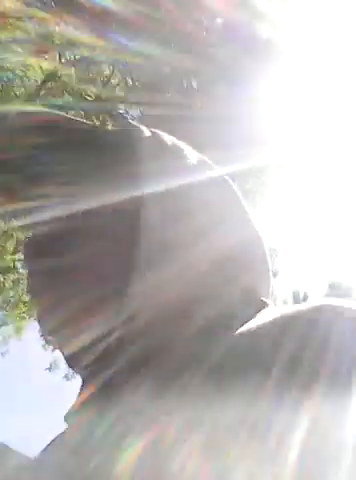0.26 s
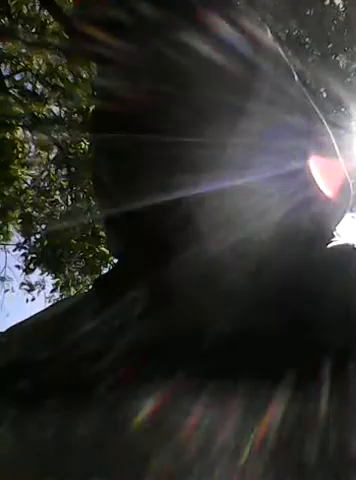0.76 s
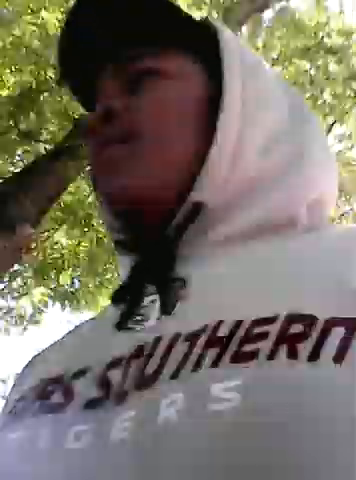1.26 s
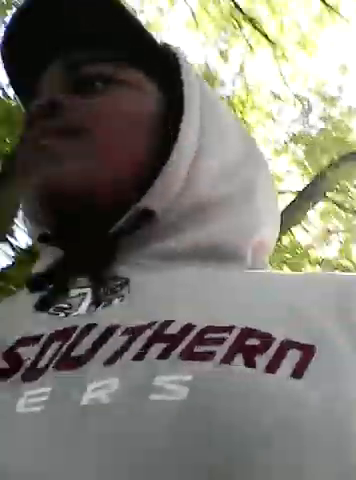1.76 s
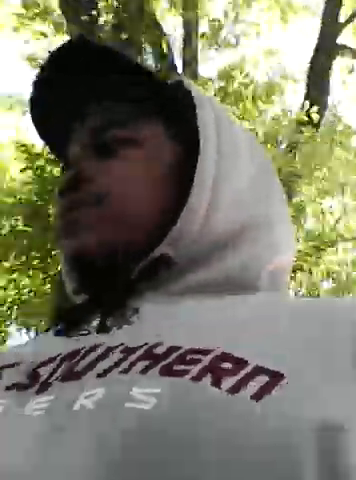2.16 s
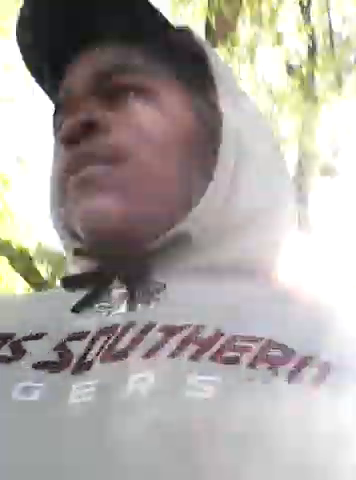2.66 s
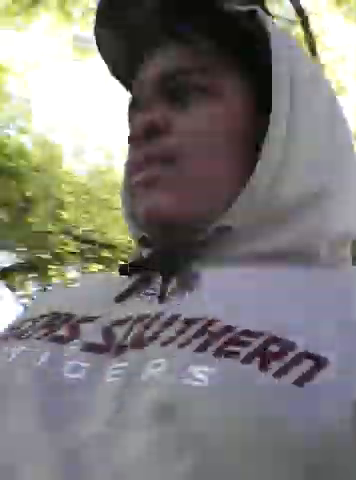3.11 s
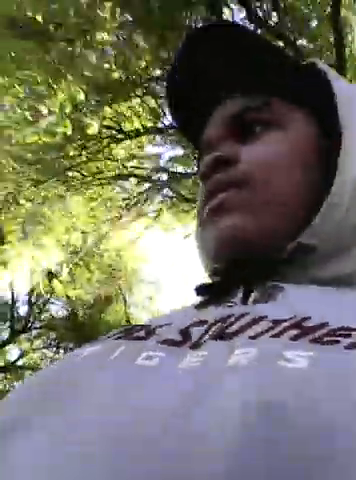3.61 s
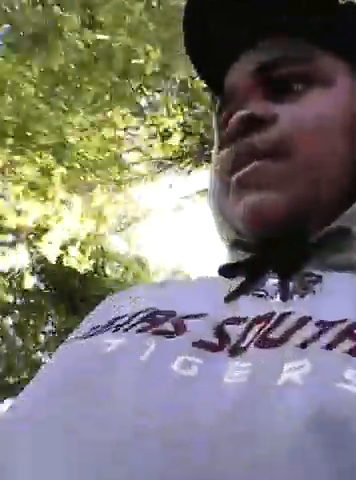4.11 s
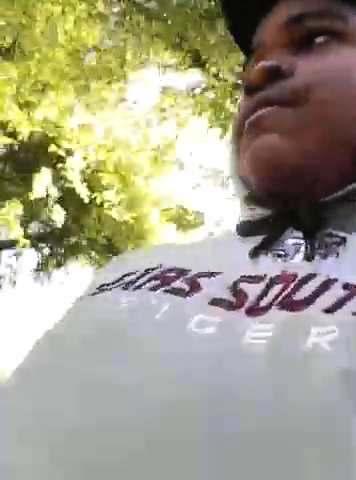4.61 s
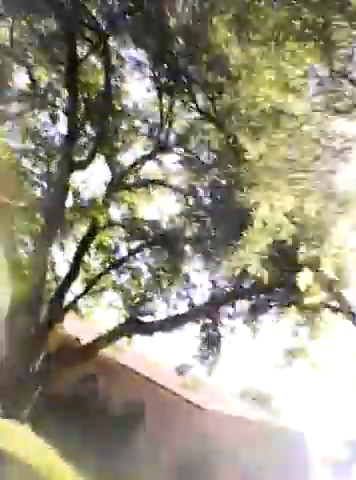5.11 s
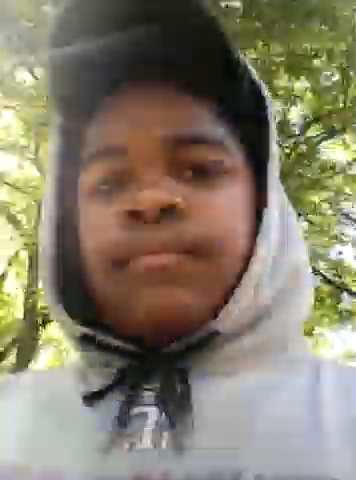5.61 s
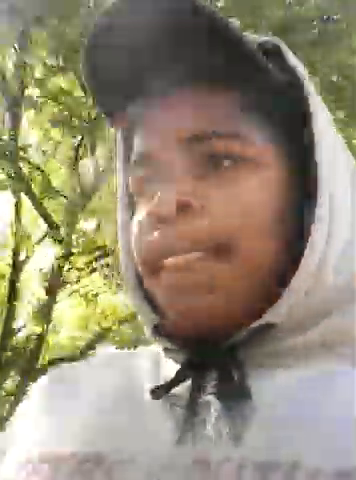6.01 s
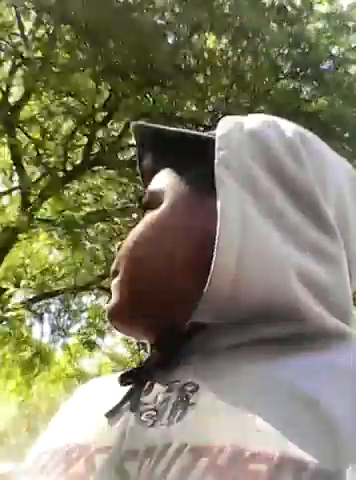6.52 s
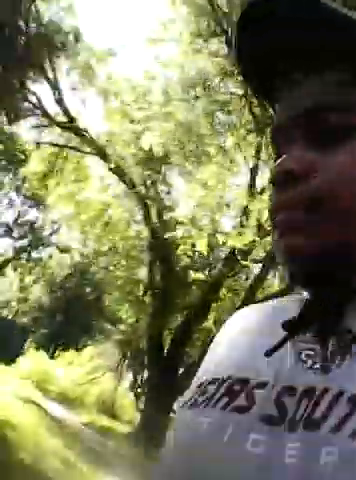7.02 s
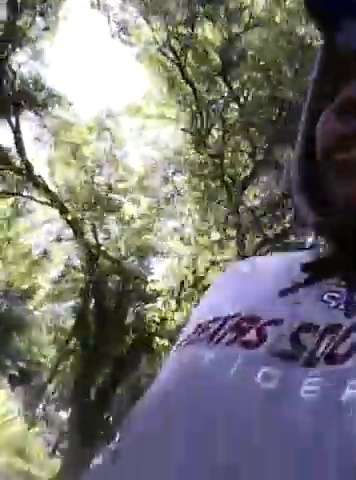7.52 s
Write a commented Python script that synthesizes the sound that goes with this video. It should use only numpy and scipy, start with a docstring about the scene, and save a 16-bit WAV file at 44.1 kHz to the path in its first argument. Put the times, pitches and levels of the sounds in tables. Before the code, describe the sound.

Skateboard rumbling over rough pavement outdoors, hard wheels whirring, with thumps and clacks, a dense clattering burst midway, then a gritty hiss swelling and fading.

```python
"""A rumbling skateboard deck and whirring hard wheels come first, dotted with thumps, clacks and a dry snap.
The grain of the pavement drives deck and wheels as noise through resonances and colour filters.
Thumps, edges, grit and a pebble give short coloured bursts; a shoe scuffs in gated, gritty noise.
Faint gliding bands of noise come and go, air buffets the microphone and a broad rush swells and fades.
The rider holds a phone, which hears all this through two microphones."""
import sys
import numpy as np
from scipy import signal
from scipy.fft import rfft, irfft, next_fast_len
from scipy.io import wavfile
from scipy.ndimage import uniform_filter1d

SR = 44100
rng = np.random.default_rng(int(sys.argv[2]) if len(sys.argv) > 2 else 0)


def transcribe(signal):
    """Save signal, clipped to [-1, 1], as a 16-bit WAV file at the path in sys.argv[1]."""
    frames = np.atleast_2d(signal).T
    limited = np.clip(frames, -1, 1)
    pcm = np.round(limited * 32767).astype(np.int16)
    wavfile.write(sys.argv[1], SR, pcm)


N = 342304

# the paving along the ride, before the bumps: time_s, deck_rumble_db, wheel_whirr_db
RIDE_LEVELS = [(0, -15.5, -38.5), (0.3, -16, -38), (0.75, -16.5, -41), (1.0, -18.5, -38),
               (1.35, -16.5, -38), (1.86, -16.5, -38), (1.9, -22, -41.5), (2.3, -22, -39),
               (2.85, -18.5, -41.5), (3.25, -22.5, -40), (3.62, -24.5, -39.5), (4.15, -17.5, -41.5),
               (4.9, -25.5, -41), (5.35, -20.5, -39), (6.2, -25, -47), (6.35, -20.5, -49.5),
               (7.25, -22.5, -43), (7.76, -21, -41.5)]


def undb(db):
    """Decibels to gain."""
    return 10 ** (np.asarray(db) / 20)


def unit(x):
    """Scale to rms 1."""
    return x / np.sqrt(np.mean(x ** 2) + 1e-18)


def curve(rows, axis=1):
    """One column of a table, joined by straight lines in time."""
    rows = np.array(rows)
    return np.interp(np.arange(N) / SR, rows[:, 0], rows[:, axis])


def colour(x, points):
    """Causal, minimum-phase filter through the given (Hz, dB) points, built by folding the cepstrum."""
    n = next_fast_len(x.shape[-1], True)
    point_hz, point_db = np.transpose(points)
    hz = np.arange(n // 2 + 1) * SR / n + 1  # 1 Hz up, to keep the logarithm finite
    log_gain = np.log(undb(np.interp(np.log(hz), np.log(point_hz), point_db)))
    cepstrum = irfft(log_gain, n)
    cepstrum[1:n // 2] *= 2
    cepstrum[n // 2 + 1:] = 0
    response = np.exp(rfft(cepstrum))
    return irfft(rfft(x, n) * response, n)[..., :x.shape[-1]]


def resonate(x, hz, width_hz):
    """One resonance, gain 1 at its centre."""
    return signal.lfilter(*signal.iirpeak(hz, hz / width_hz, SR), x)


def power(hz, centre_hz, half_width_hz, db):
    """Power response of one resonance, 6 dB down at the half width."""
    return undb(2 * db) / (1 + ((hz - centre_hz) / half_width_hz) ** 2) ** 2


def walk(rate):
    """Smooth random drift of spread near 1, heading for fresh values at the given rate per second."""
    hold = int(SR / rate)
    steps = np.repeat(rng.standard_normal(N // hold + 1), hold)
    return unit(uniform_filter1d(steps, hold)[:N])


def grit(rate, spread_db):
    """Two unrelated streams of tiny impacts of uneven size; no grain is much larger than the rest."""
    push = (rng.random((2, N)) < rate / SR) * np.sign(rng.standard_normal((2, N)))
    size_db = spread_db * np.clip(rng.standard_normal((2, N)), -2, 2)
    return unit(push * undb(size_db))


def swell(full_s, hold_s, rise_db_per_s, fall_db_per_s):
    """A gain that rises to 1 at time full_s, holds and falls away."""
    t = np.arange(N) / SR
    rise_db = (t - full_s) * rise_db_per_s
    fall_db = (full_s + hold_s - t) * fall_db_per_s
    return undb(np.clip(np.minimum(rise_db, fall_db), -200, 0))


def heave(hz, cycles, size=4096):
    """A heavily damped swing that is strongest after the given number of cycles."""
    turn = np.arange(size) / SR * hz
    return np.sin(2 * np.pi * turn) * (turn / cycles) ** 2 * np.exp(2 - 2 * turn / cycles)


def burst(points, t60, hold_s=0, size=4096, strike=0.39, rebound=0.73, rebound_s=.006, chatter_db=4):
    """A contact: a clean strike and its rebound in uneven chatter that holds and dies away; a coloured pair."""
    strike_s = .0006  # just after the first touch
    t = np.arange(size) / SR
    decay = np.log(1000) / max(t60, .004)
    length_s = hold_s + 1 / (2 * decay)
    bounces = np.repeat(rng.uniform(-1, 1, size), 64)[:size]  # a new strength every 64 samples
    envelope = np.exp(-decay * np.maximum(t - hold_s, 0))
    force = rng.standard_normal((2, size)) * envelope * undb(chatter_db * bounces)
    strikes = np.array([strike_s, strike_s + rebound_s * rng.uniform(.5, 1)])
    force[0, (strikes * SR).astype(int)] += strike * np.sqrt(length_s * SR) * np.array([1, -rebound])
    # longer contacts carry more energy
    return unit(colour(force, points)) * np.sqrt(length_s * SR / size)


def sing(hz, width_hz):
    """A noise-driven resonance whose centre follows hz; a pair of rms 1."""
    drive = rng.standard_normal((2, N)) + 1j * rng.standard_normal((2, N))
    ring = signal.lfilter(*signal.butter(2, width_hz / 2, fs=SR), drive)
    return unit(np.real(ring * np.exp(2j * np.pi * np.cumsum(hz) / SR)))


def add(track, s, sound):
    """Mix a sound in at a given time."""
    start = max(int(s * SR), 0)
    track[:, start:start + sound.shape[-1]] += sound[..., :N - start]


def ports(pair, lean, wide_db, bass_hz=700):
    """Left and right from a sound and its diffuse twin; lean turns it towards the left microphone."""
    # difference of the two microphones against their sum, before wide_db: pitch_hz, level_db
    side_levels = [(100, -24), (450, -15.5), (1100, -5), (1700, -3.5), (2450, 1), (3300, -8.5),
                   (4000, -3.5), (4800, 4), (6800, 6), (8500, 3)]
    # how far each pitch follows the lean: pitch_hz, share
    lean_shares = [(200, .2), (1000, 0.85), (2500, 0.92), (4800, 0.94), (8000, 0.43)]
    bass_lead_s = .000045  # the bass reaches the left microphone this much earlier
    n = next_fast_len(N, True)
    hz = np.arange(n // 2 + 1) * SR / n + 1
    level_hz, level_db = np.transpose(side_levels)
    share_hz, share = np.transpose(lean_shares)
    side_db = wide_db + np.interp(np.log(hz), np.log(level_hz), level_db)
    lean = np.clip(lean * np.interp(np.log(hz), np.log(share_hz), share), -.97, .97)
    direct, diffuse = rfft(pair, n)
    lead = 1j * np.pi * hz * bass_lead_s / (1 + (hz / bass_hz) ** 2)
    mix = lean * direct + np.sqrt(1 - lean ** 2) * diffuse
    side = irfft(mix * undb(side_db) + lead * direct, n)[:N]
    return np.array([pair[0] + side, pair[0] - side])


def rumble(bumps):
    """The uneven ground rings the deck, most on the first stretch, and makes the whole board shudder."""
    # resonances of the deck with the rider on it, each passed twice: pitch_hz, width_hz (one pass), level_db
    deck_modes = [(137.5, 46.7, -1.5), (168.5, 46.6, 1.5), (200.8, 58.7, 0.5), (507, 130, -31),
                  (985, 62, -29)]
    # colour of the shuddering board: pitch_hz, level_db
    shudder_colour = [(25, -32), (60, -16), (130, 5.5), (250, 4.5), (320, -3.5), (420, -8.5), (620, -13.5),
                      (790, -21), (1020, -16), (1250, -33.5), (1700, -38), (2500, -54.5)]
    ground = grit(rate=3000, spread_db=1)
    deck = sum(undb(db) * resonate(resonate(ground, hz, width), hz, width) for hz, width, db in deck_modes)
    shudder = colour(grit(rate=2000, spread_db=5.0), shudder_colour) * undb(0.72 * bumps)
    # rough paving rings the deck: 0.72 dB more ring for each dB of rumble above -18 dB
    ring_db = 0.72 * (curve(RIDE_LEVELS) + 18)
    board = undb(ring_db) * unit(deck) + undb(-7.5 - 0.96 * ring_db) * unit(shudder)
    return ports(board * undb(curve(RIDE_LEVELS) + 0.56 * bumps), lean=-.1, wide_db=1.0)


def whirr(bumps):
    """Hard wheels patter over the grain of the paving; the tone shifts along the path."""
    # colours of the whirr on four stretches of the path: pitch_hz, level_db
    early_colour = [(880, -41), (1500, -30), (1560, -27.5), (2070, -8.5), (2320, 2.5), (2610, 7), (3020, 1),
                    (3620, 3.5), (4840, -2), (5520, -11), (7220, -16.5), (7940, -17), (8540, -47.5),
                    (11100, -80), (18800, -120)]
    smooth_colour = [(710, -10.5), (1200, -3.5), (1690, -11.5), (2100, -7.5), (2500, -9.5), (3000, -8.5),
                     (3500, -3), (4200, -2), (4750, -17.5), (5200, -14.5), (6200, -14.5), (7000, -22.5),
                     (8060, -27.5), (8600, -49)]
    middle_colour = [(710, -23), (1200, -14), (1690, -13), (2100, -11.5), (2400, -7), (2900, -6),
                     (3400, 0.5), (4150, -3), (4800, -12), (5400, -17), (5900, -16), (7000, -22.5),
                     (8060, -26.5), (8600, -50)]
    late_colour = [(1180, -25), (2000, -13), (2800, -3.5), (3400, 2), (4000, -10), (4500, -2), (4900, -3),
                   (5400, -5), (6000, -9.5), (7100, -14.5), (8000, -21.5), (8600, -59)]
    grain = grit(rate=7000, spread_db=3.0)
    # crossfades between stretches: (time_s, share)
    early = curve([(1.5, 1), (1.87, 0)])
    late = curve([(5.7, 0.006), (7, 1)])
    smooth = (1 - early) * curve([(2.4, 0.99), (2.75, 0.01)])
    middle = 1 - early - smooth - late
    stretches = [(early, early_colour), (smooth, smooth_colour), (middle, middle_colour), (late, late_colour)]
    tone = sum(np.sqrt(np.abs(share)) * unit(colour(grain, points)) for share, points in stretches)
    return ports(tone * undb(curve(RIDE_LEVELS, axis=2) + 1.53 * bumps), lean=0.69, wide_db=-1.0)


def thumps(cycles=0.756, knock_db=-14, ring_db=-12, ring_t60=0.093):
    """Low thumps under the board, at cracks and in the rough rumble: a heave, a ring and a woody knock."""
    # thumps: peak_s, level_db, pitch_hz
    heaves = [(0.183, -13, 186), (0.255, -2, 195), (0.902, -4, 187), (1.244, -4.5, 178), (1.369, -6, 201),
              (1.442, -6, 196), (1.741, -1.5, 195.5), (1.858, -5.5, 183), (2.935, -6.5, 186),
              (3.0362, -1, 128.5), (3.162, 2.5, 201), (3.235, -6, 211), (3.735, -6.5, 218),
              (3.783, -1.5, 203), (3.979, -4, 226), (3.99, -5.5, 134.4), (4.013, 0, 170), (4.048, -7, 189),
              (4.099, -4, 175), (4.122, -1.5, 232), (4.152, -10.5, 186), (4.23, -2, 193),
              (4.249, -3.5, 184), (4.271, -6.5, 173), (4.319, -5.5, 196), (4.338, -6, 152),
              (4.373, -5.5, 102.4), (4.439, -8, 224), (4.519, -5.5, 169), (4.84, -13.5, 129),
              (5.639, -9, 110), (6.334, -9, 137), (7.693, -13.5, 170)]
    # the wooden knock that goes with a thump: pitch_hz, level_db
    knock_colour = [(100, -26), (250, 9), (380, 4.5), (520, -1), (700, -15.5), (1100, -23), (2500, -45)]
    # the ring that a thump leaves in the deck: pitch_hz, level_db
    ring_colour = [(70, -23), (130, -3.5), (200, -0.5), (300, -7.5), (600, -29), (1500, -56.5)]
    track = np.zeros((2, N))
    for s, db, hz in heaves:
        # the harder the thump, the more the wood knocks
        sound = undb(knock_db + 0.67 * db) * burst(knock_colour, t60=0.027)
        sound += undb(ring_db) * burst(ring_colour, t60=ring_t60, strike=0)
        sound[0] += heave(hz, cycles)
        add(track, s - cycles / hz, undb(db) * sound)
    return ports(track, lean=.1, wide_db=3.0)


def rattles(count=24):
    """Fine crackle and loose rattle over rough paving: light clacks at uneven intervals, as rows for clacks."""
    # runs of rattle: start_s, length_s, level_db, contact_s
    runs = [(0.076, 0.77, -33.5, .001), (0.952, .72, -27, 0.0011), (3.949, .24, -30, .002),
            (4.218, 0.42, -32, .0015)]
    knock_db, crack_db, sizzle_db = 1.5, -12.5, -21
    rows = []
    for start, length, db, contact_s in runs:
        times = start + length * (np.arange(count) + rng.random(count)) / count
        levels = db + 2 * rng.standard_normal(count)
        rows += [(s, level_db, knock_db, crack_db, sizzle_db, contact_s) for s, level_db in zip(times, levels)]
    return rows


def clacks():
    """Wheels strike edges and grit; each blow rings wheels and trucks with its own knock, crack and sizzle."""
    # blows: start_s, level_db, knock_db (lows), crack_db (broad crack), sizzle_db (top), contact_s
    blows = [(0.024, -20, 3.5, -10, -33, .002), (0.177, -31, 0, -15, -21, 0.0036),
             (0.308, -20.5, 7, -10, -27, 0.0037), (0.402, -27.5, 9, -13, -22.5, .004),
             (0.525, -21.5, 6, -14, -18, 0.0023), (0.5415, -23.5, 1, -12, -29, 0.0016),
             (0.776, -27.5, 1, -16, -22, 0.0022), (0.823, -30.5, -6, -16, -20, 0.00093),
             (0.9015, -21.5, -5.5, -19, -22, .0015), (1.003, -25, 4, -14, -20, 0.0014),
             (1.068, -19, 8, -17, -19, 0.0023), (1.191, -28, 5, -13, -27, 0.0017),
             (1.241, -23, -1, -19, -28, 0.00087), (1.289, -28, -1, -14, -24, 0.0029),
             (1.344, -26, -2, -16, -29, 0.0028), (1.3773, -30, -5, 12, -14, 0.0019),
             (1.468, -25.5, 0, -16, -20, 0.0026), (1.543, -23.5, 0, -13, -22, 0.0025),
             (1.594, -21.5, -8.5, -18, -10.5, 0.0023), (1.6218, -22.5, 6, -2.5, -16, .005),
             (1.653, -26, 5, -1, -16, 0.0044), (1.734, -23.5, 3.5, -6, -16, 0.0075),
             (2.403, -24.5, 7.5, -11, -7, 0.0044), (2.7764, -22.5, -11, -21, 0, .005),
             (2.841, -25, 1, -13, -3, 0.0026), (2.933, -22.5, 1.5, -15, -18, .005),
             (3.025, -17.5, 12.5, 3, -15, .003), (3.027, -11, -14, -8.5, -14, 0.0033),
             (3.155, -20, 6.5, -6, -7, .004), (3.717, -23.5, 1, -15, -9, 0.0037),
             (3.729, -27.5, 2.5, -10, -11, 0.0069), (3.7793, -20, 10.5, -9, -11, 0.0042),
             (3.846, -18, 0, -12, -10, 0.0029), (3.854, -12.5, 9.5, -15, -13, .0025),
             (3.918, -24, 6, -13, -7.5, 0.01), (3.973, -18, 7.5, -11, -7, 0.0073),
             (3.9845, -11, 7.5, -14, -9, 0.0033), (3.9993, -20, 3, -14, -7, .006),
             (4.026, -15, 10, -10, -10, .003), (4.043, -23.5, 11, -4, -4, 0.0041),
             (4.07, -22.5, 4, -12, -10, 0.0045), (4.095, -24, -1, -6, -10, 0.0055),
             (4.115, -24.5, 11, -8, -6, 0.0067), (4.134, -20, -1.5, -13, -19, 0.0065),
             (4.15, -22, 9, -15, -16, 0.0037), (4.238, -22.5, -0.5, -18, -10, 0.004),
             (4.313, -25.5, 2.5, -18, -12, 0.0049), (4.335, -26.5, 4.5, -14, -20, 0.0036),
             (4.4327, -13.5, 1, -15, -13, .0025), (4.4384, -18, 7.5, -10, -12, 0.0033),
             (4.5144, -22.5, 6, -13, -8, 0.0057), (4.58, -26, 8.5, -12, -10, .009),
             (4.612, -25.5, 3, -11, -3, 0.004), (4.627, -29, 9, -12, -2, 0.0037),
             (5.615, -22.5, -10, -12, -22, 0.0028), (6.3184, -20, 14.5, 14, -24, .002),
             (6.325, -25, 17, 6, -16, .005), (6.3345, -29, 13, -4, -20, 0.0039),
             (6.5202, -22, 6, 8, -4.5, 0.0013), (6.7363, -23, 1.5, 10, -24, .0015),
             (7.7, -27, 6, -8, -8, 0.0037)]
    # resonances of deck, wheels and trucks before scatter: pitch_hz, half_width_hz, level_db
    struck_modes = [(404, 310, 3), (656, 270, -3), (994, 102, 6), (1338, 24, -1.5), (1810, 110, -22),
                    (2380, 130, 1), (2970, 320, 1), (3590, 340, 8), (4400, 380, 1), (6200, 900, 1)]
    crack_hz, crack_half_width_hz = 1700, 500  # the broad, dry crack of a wheel on a sharp edge
    track = np.zeros((2, N))
    hz = np.geomspace(100, 16000, num=300)
    for s, db, knock_db, crack_db, sizzle_db, contact_s in blows + rattles():
        # pitch and mix of resonances vary from blow to blow
        detune = 1 + 0.05 * rng.uniform(-1.4, 1)
        scatter_db = 4.5 * rng.uniform(-1.1, 1, len(struck_modes))
        # the resonances and the broad crack add up in power
        body = sum(power(hz / detune, *mode) * undb(2 * extra_db)
                   for mode, extra_db in zip(struck_modes, scatter_db))
        tilt_db = np.interp(hz, [1260, 2680, 4320, 6300], [knock_db, 0, 0, sizzle_db])
        crack = power(hz, crack_hz, crack_half_width_hz, crack_db)
        tone_db = 10 * np.log10(body * undb(2 * tilt_db) + crack)
        # the chatter holds, then dies away, both in proportion to the contact
        sound = burst(np.transpose([hz, tone_db]), t60=8.3 * contact_s, hold_s=.45 * contact_s,
                      strike=0.58, rebound=1.0, rebound_s=contact_s, chatter_db=6.5)
        add(track, s, undb(db) * sound)
    return ports(track, lean=0.56, wide_db=0)


def scrapes():
    """Sand grinds under sole and wheels in quick, uneven slips."""
    # gritty scrapes of shoe and wheels: full_s (full level reached), hold_s, level_db
    slips = [(1.516, 0.15, -41), (1.721, 0.008, -42.5), (1.803, 0.039, -44), (2.394, 0.059, -42.5),
             (2.721, 0.096, -26), (2.855, 0.067, -24), (2.964, 0.15, -34), (3.706, 0.093, -48),
             (3.836, 0.011, -34), (3.971, 0.07, -35), (4.093, 0.042, -31), (4.166, 0.26, -43),
             (4.616, 0.03, -38), (4.45, 0.58, -44.5)]
    # colour of the scrape's body: pitch_hz, level_db
    body_colour = [(700, -13.5), (1800, -16), (2400, -4.5), (3000, -6.5), (4000, 10), (5000, -3),
                   (6000, -4.5), (7400, -25), (8600, -30)]
    # sizzle of each scraping stretch, passed twice: pitch_hz, width_hz (one pass), level_db (against the body)
    sizzle_modes = [(5370, 1100, 13), (5780, 1330, -3.5), (6450, 890, -1)]
    # where the second and third scraping stretches begin: start_s
    stretch_starts = [2.2, 3.5]
    grain = grit(rate=7000, spread_db=5.5) * undb(2.5 * np.clip(walk(rate=200), -2, 2))
    body = unit(colour(grain, body_colour))
    tones = []
    for hz, width, db in sizzle_modes:
        sizzle = unit(resonate(resonate(grain, hz, width), hz, width))
        tones.append(unit(body + undb(db) * sizzle))
    track = np.zeros((2, N))
    for s, hold_s, db in slips:
        # each scrape bites fast and lets go more slowly
        force = undb(db) * swell(s, hold_s, rise_db_per_s=2192, fall_db_per_s=414)
        track += force * tones[np.searchsorted(stretch_starts, s)]
    return ports(track, lean=0.93, wide_db=-1.0)


def snap():
    """A pebble snaps from under a wheel: a sharp, heavily damped swing and a brief, bright chatter."""
    # colour of the chatter: pitch_hz, level_db
    snap_colour = [(500, -17), (900, -14), (1150, 0), (1700, 5), (2000, 1.5), (2700, 9), (3400, 5),
                   (4300, -6), (4900, 6.5), (5900, -7.5), (7400, -8), (8500, -28), (15000, -54)]
    start_s, chatter_level_db = .218, -10
    track = np.zeros((2, N))
    chatter = burst(snap_colour, t60=0.0097, hold_s=0.0025, strike=0.77, rebound=0.13, rebound_s=0.0045)
    sound = undb(chatter_level_db) * chatter
    sound[0] += heave(hz=1450, cycles=0.98)
    add(track, start_s, sound)
    return ports(track, lean=0.5, wide_db=-5.5)


def pings():
    """A grain of grit crushed under a wheel gives a thin, bright tick with no knock under it."""
    # crushed grains: start_s, level_db, pitch_hz
    grains = [(0.67, -30, 4980), (3.957, -28, 6150), (4.1022, -17, 6400), (4.175, -35, 6300),
              (4.301, -22.5, 6500), (4.479, -19.5, 6580), (4.635, -28, 6640), (4.819, -36.5, 6500),
              (4.966, -26, 6900), (6.399, -35.5, 7000)]
    # their colour: pitch_ratio (multiple of the grain's pitch), level_db
    ping_colour = [(0.399, -30.5), (0.599, -6.5), (.7, 6), (.85, -15), (1.001, 7.5), (1.12, -9.5),
                   (1.3, -12.5), (1.6, -20.5)]
    track = np.zeros((2, N))
    for s, db, hz in grains:
        points = [(hz * ratio, gain_db) for ratio, gain_db in ping_colour]
        add(track, s, undb(db) * burst(points, t60=0.034, hold_s=0.002, strike=.1))
    return ports(track, lean=0.41, wide_db=0)


def gliding_bands():
    """Faint bands of coloured noise, some narrow enough to whine, rise, glide and fade."""
    # bands: full_s (full level reached), hold_s, first_hz, last_hz, width_hz, level_db (before flutter)
    glides = [(.27, 0.48, 4800, 5000, 600, -49), (1.949, 0.68, 5530, 5800, 650, -51.5),
              (5.121, .38, 2562, 2480, 453, -44), (5.6, 0.62, 3590, 3410, 350, -47.5),
              (5.988, .3, 1663, 1707, 120, -45), (7.221, 0.25, 4730, 4820, 496, -52.5)]
    track = np.zeros((2, N))
    for s, hold_s, first_hz, last_hz, width_hz, db in glides:
        waver = 1 + 0.011 * walk(rate=12)
        centre_hz = curve([(s, first_hz), (s + hold_s, last_hz)]) * waver
        flutter_db = 3 * walk(rate=20)
        gain = swell(s, hold_s, rise_db_per_s=46.5, fall_db_per_s=106.5) * undb(db + flutter_db)
        track += gain * sing(centre_hz, width_hz)
    return ports(track, lean=.3, wide_db=-3.0)


def rush(crest_width_hz=1000, crest_db=-7):
    """A broad, gritty hiss swells and fades along the ride; around its height a band in it climbs in pitch."""
    # height of the rush, before its flicker: time_s, level_db
    rush_levels = [(4.3, -55.5), (5.0, -42.5), (5.6, -38.5), (6.2, -35.5), (6.36, -30.5), (6.7, -34),
                   (7.01, -33), (7.35, -36), (7.76, -46.5)]
    # colour of the hiss: pitch_hz, level_db
    hiss_colour = [(200, 7.5), (500, 5), (800, 5), (1150, 3.5), (1700, -0.5), (2100, -1.5), (2600, -2.5),
                   (3400, -4), (4050, -9.5), (4850, -6.5), (5800, -29), (7000, -22.5), (8500, -42.5)]
    hiss = unit(colour(grit(rate=5000, spread_db=5.5), hiss_colour))
    crest_hz = curve([(6.4, 1543), (7.25, 2397)])
    crest = sing(crest_hz, crest_width_hz) * swell(6.45, 0.7, rise_db_per_s=40, fall_db_per_s=50)
    level_db = curve(rush_levels) + 0.82 * walk(rate=29) + 1.2 * walk(rate=200)
    return ports((hiss + undb(crest_db) * crest) * undb(level_db), lean=.15, wide_db=-5.0)


def buffet():
    """Moving air flutters on the phone: low, coloured noise of unsteady level."""
    # air on the microphone, before its flutter: time_s, level_db
    air_levels = [(0, -34), (1.0, -33), (1.75, -29.5), (2.0, -34.5), (3.65, -34.5), (4.35, -17),
                  (4.55, -22.5), (5.05, -25.5), (5.6, -22.5), (6.15, -33), (6.5, -25.5), (7.0, -27),
                  (7.76, -27)]
    # colour of the air: pitch_hz, level_db
    air_colour = [(20, -40.5), (35, -25), (55, -4.5), (85, 5.5), (120, -5), (200, -11.5), (500, -73)]
    air = unit(colour(rng.standard_normal((2, N)), air_colour))
    return ports(air * undb(curve(air_levels) + 1.5 * walk(rate=18)), lean=.1, wide_db=3.5)


def scene():
    """The same bumps in the path drive deck and wheels; every other source is laid on top."""
    bumps = walk(rate=35)
    rolling = rumble(bumps) + whirr(bumps)
    contacts = thumps() + clacks() + scrapes() + snap() + pings()
    return rolling + contacts + gliding_bands() + rush() + buffet()


def record(dry):
    """The phone passes little above 8 kHz and flattens the loudest peaks."""
    narrow = signal.sosfilt(signal.butter(12, 7900, fs=SR, output="sos"), dry)
    clipped = narrow / (1 + narrow ** 10) ** (1 / 10)
    dulled = signal.sosfilt(signal.butter(4, 9000, fs=SR, output="sos"), clipped)
    # a steep low-pass at 15.5 kHz ends the band
    return signal.sosfilt(signal.ellip(8, .2, 70, 15500, fs=SR, output="sos"), dulled)


dry = scene()
out = record(dry)
transcribe(out)
```